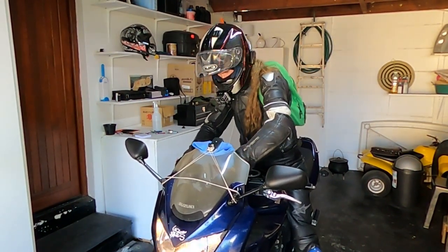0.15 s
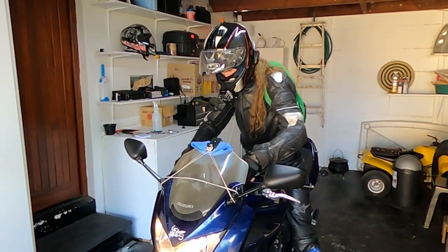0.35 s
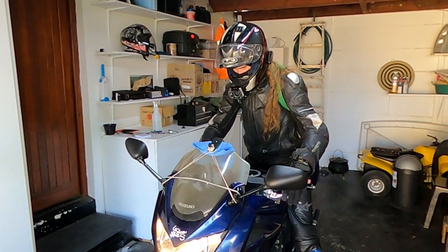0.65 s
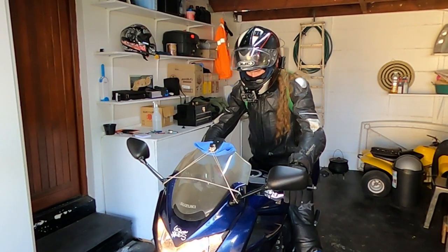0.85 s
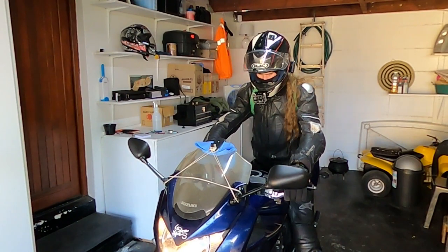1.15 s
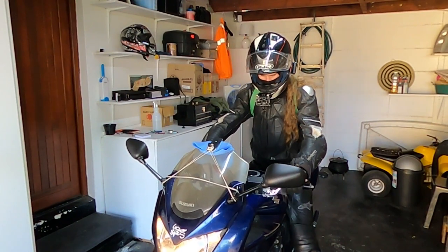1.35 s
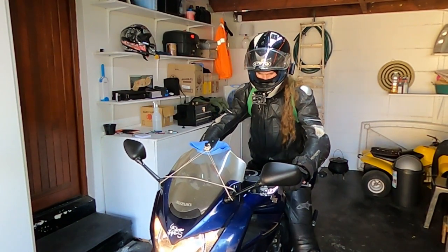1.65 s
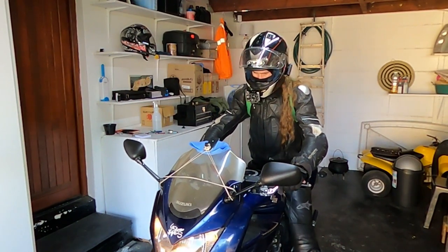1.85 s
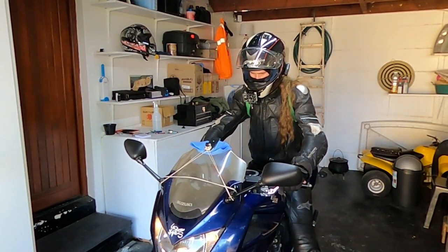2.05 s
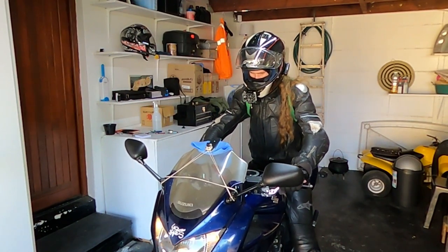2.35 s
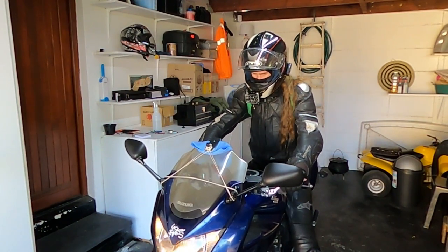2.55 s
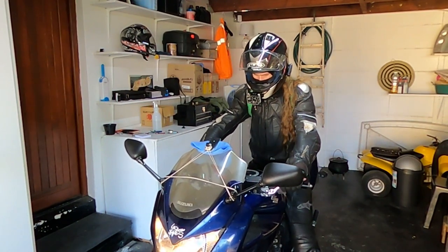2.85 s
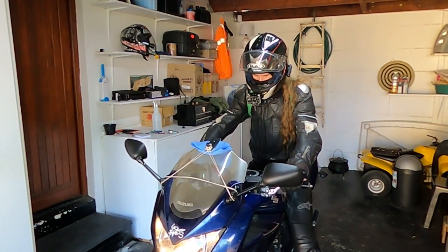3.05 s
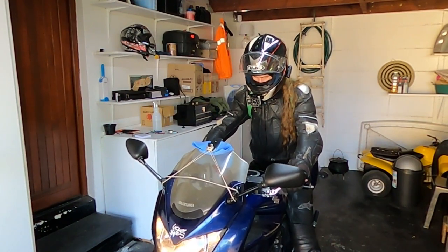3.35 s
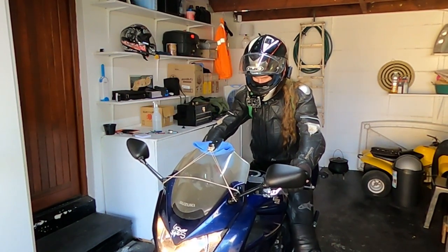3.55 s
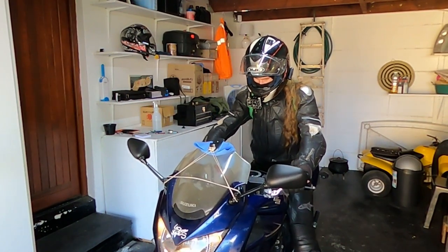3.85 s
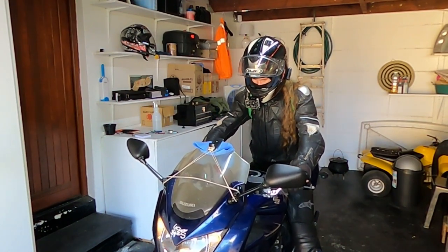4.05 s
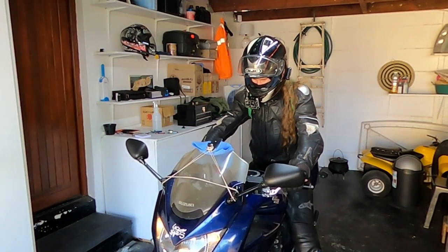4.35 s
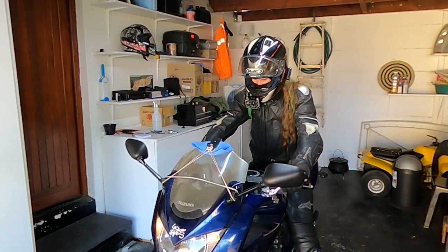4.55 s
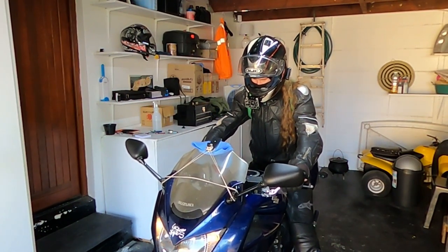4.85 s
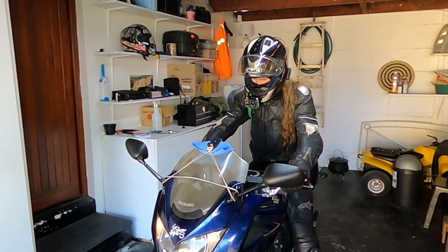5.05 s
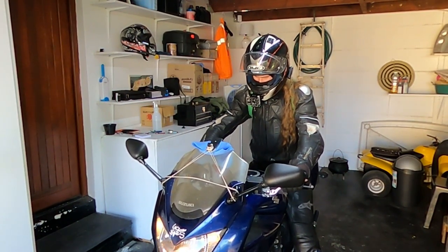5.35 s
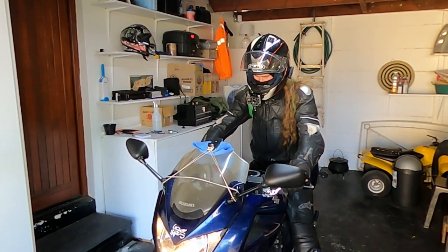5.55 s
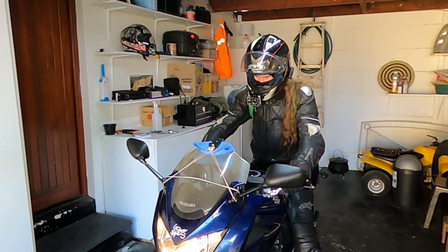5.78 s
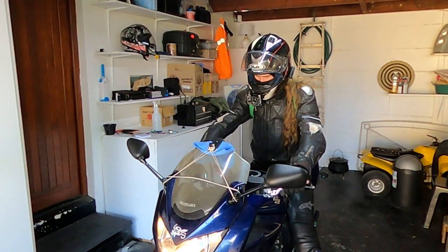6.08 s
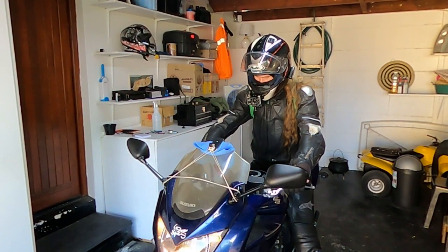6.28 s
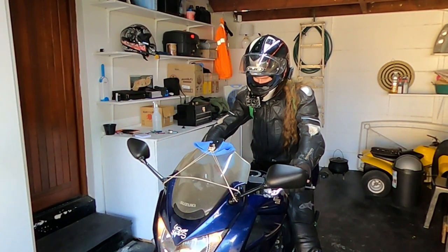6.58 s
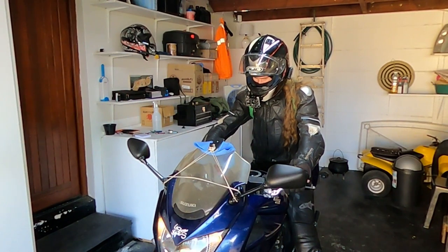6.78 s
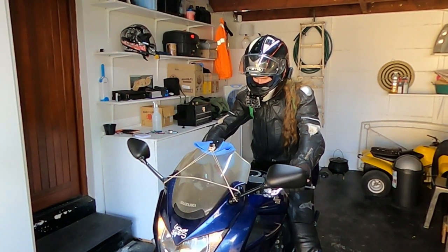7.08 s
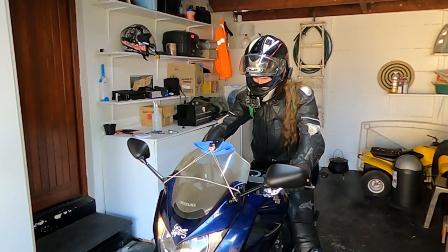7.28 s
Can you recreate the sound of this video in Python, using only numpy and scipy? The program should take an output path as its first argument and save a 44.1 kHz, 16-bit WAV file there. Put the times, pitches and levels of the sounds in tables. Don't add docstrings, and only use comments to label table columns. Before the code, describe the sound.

In a small, reverberant garage, a rider's leathers creak and a key clinks. A motorcycle starter then whines, pulsing under compression, and the engine catches in a rough, barking run before stalling with a clank. A longer crank yields only a brief cough and more clanks; a third short crank ends in a few weak firings. Close stereo microphone, faint traffic rumble outside.

```python
import sys
import numpy as np
from scipy import signal
from scipy.fft import rfft, irfft, next_fast_len
from scipy.io import wavfile
from scipy.ndimage import uniform_filter1d, map_coordinates

SR = 44100
rng = np.random.default_rng(int(sys.argv[2]) if len(sys.argv) > 2 else 0)


def bounce(signal):
    frames = np.transpose(np.atleast_2d(signal))
    limited = np.clip(frames, -1, 1)
    pcm = np.round(limited * 32767).astype(np.int16)
    wavfile.write(sys.argv[1], SR, pcm)


def volts_from_db(level):
    exponent = np.asarray(level, float) / 20
    return 10 ** exponent


N = 327222
T = np.arange(N) / SR

# (time [s], spin-up [s], hold [s], level [dB])
STARTER_STARTS = [
    (1.929, 0.066, 0.034, -31),
    (3.873, 0.11, 0.014, -34.5),
    (6.366, .126, 0.067, -33),
]
# (time [s], rise [s], top tooth rate [Hz], droop [s], tooth rate after droop [Hz])
SPIN_UPS = [
    (1.929, 0.098, 1050, 0.019, 1042),
    (3.872, 0.081, 862, .057, 791.1),
    (6.368, .085, 828, .107, 790.2),
]
# (time [s], length [s], clatter [dB], bark [dB], boom [dB])
ENGINE_CATCHES = [
    (2.366, 0.88, -23.5, -17.5, -36),
    (5.274, 0.35, -23.5, -29, -27),
    (6.946, 0.272, -21.5, -29, -28.5),
]
# (time [s], peak level [dB])
UNFIRED_PUFFS = [(2.126, -20), (2.225, -23), (2.328, -20), (4.076, -20.5), (4.173, -20.5), (4.279, -25),
                 (4.387, -25), (4.476, -24.5), (4.587, -22), (4.689, -23.5), (4.799, -24), (4.9, -23),
                 (5.01, -24.5), (5.103, -23), (5.218, -23.5), (6.473, -23), (6.594, -22.5), (6.686, -25.5),
                 (6.786, -23), (6.889, -25), (7.289, -26), (7.379, -32)]
# (frequency [Hz], width [Hz], level [dB])
CASING_MODES = [(450, 98, -8.5), (964, 60, 0), (1102, 53, 5.5), (1192, 49, 6.5), (1291.2, 130, 5.5),
                (1612, 220, 2), (2383, 120, 0), (2896, 500, -3), (4015, 120, -5), (4800, 270, -5),
                (5476, 80, -5.5), (6223, 170, -3.5), (7380, 160, -7.5), (8980, 180, -12.5),
                (10070, 140, -14), (11180, 130, -25)]
# (time [s], level [dB])
STREET_LEVEL = [(0, -61.5), (.4, -65.5), (1.9, -62.5), (3.3, -54), (3.95, -52), (5.8, -58), (7.42, -54.5)]

CRANK_DB, REST_HZ = -16.5, 310.3


def unit(x):
    return x / np.sqrt(np.mean(x ** 2) + 1e-20)


def along(points, hz):
    f, v = np.transpose(points)
    return np.interp(np.log(hz + 1), np.log(f + 1), v)


def gain(rows):
    s, db = np.transpose(rows)
    return volts_from_db(np.interp(T, s, db, -120, -120))


def wobble(rate_hz):
    knots = rng.standard_normal(int(N * rate_hz / SR) + 4)
    return map_coordinates(knots, [T * rate_hz])


def filtered(x, response):
    m = next_fast_len(N + SR // 2)
    return irfft(rfft(x, m) * response(np.fft.rfftfreq(m, 1 / SR)), m)[..., :N]


def resonances(peaks):
    def response(f):
        total = 0
        for k, (c, w, db) in enumerate(peaks):
            total = total + (-1) ** k * volts_from_db(db) * 1j * f * w / (c * c - f * f + 1j * f * w)
        return total
    return response


def mode(x, hz, width_hz, db):
    b, a = signal.iirpeak(hz, hz / (1.5 * width_hz), SR)
    return volts_from_db(db) * signal.lfilter(b, a, signal.lfilter(b, a, x))


def hiss(spectrum, grain_db=0):
    x = rng.standard_normal(N) * volts_from_db(grain_db * wobble(300))
    return unit(filtered(x, lambda hz: volts_from_db(along(spectrum, hz))))


def blows(rows):
    s, db = np.transpose(rows)[:2]
    return np.bincount(np.round(s * SR).astype(int), volts_from_db(db), N)[:N]


def held(s, length_s, db, attack_s, fade_db, release_db):
    t = np.maximum(T - s, 0)
    return (1 - np.exp(-t / attack_s)) * volts_from_db(db - fade_db * t - release_db * np.maximum(t - length_s, 0))


def starter():
    # (multiple of tooth rate, level [dB])
    teeth = [(1, 0.5), (2, -1), (3, -6), (4, 0), (5, -3), (6, -6), (7, -9.5), (8, -11.5), (9, -7.5),
             (10, -13)]
    # (frequency [Hz], width [Hz], level [dB])
    shell = [(820, 110, 0), (980, 120, 1), (1206, 230, 3), (1670, 250, 2.5), (2070, 92, 2.5),
             (2248, 360, -2.5), (2411, 130, 5.5), (2896, 230, 9), (3291, 78, -1), (3980, 200, -3.5),
             (5200, 270, -7.5), (6240, 570, -5.5), (7440, 300, -8), (8800, 400, -12.5), (10100, 300, -10.5)]
    # (frequency [Hz], density [dB per Hz])
    rasp_spectrum = [(3240, -33.5), (6180, -3.5), (7580, -7.5), (8440, -23), (10200, -14.5), (11300, -24.5),
                     (12500, -31.5), (13600, -23), (14900, -49.5)]
    # (frequency [Hz], density [dB per Hz])
    grind_spectrum = [(41, -44), (70, -10), (109, -34), (155, -12), (513, -14.5), (720, -16.5),
                      (1160, -6.5), (2880, -11), (3760, -12), (6120, -15), (9000, -28), (11700, -54),
                      (19800, -120)]
    shell_floor_db = -14

    load, bite, hz = gear_load()
    hz = uniform_filter1d(spun_up(hz), size=SR // 200) * (1 + .009 * wobble(90))
    turn = 2 * np.pi * np.cumsum(hz) / SR

    whine = np.zeros(N)
    for k, db in teeth:
        flutter = volts_from_db(db + 4 * np.tanh(wobble(85)))
        whine += flutter * meshing(hz, k) * np.sin(k * turn + k * k)
    whine = filtered(load * bite * whine, lambda f: abs(resonances(shell)(f)) ** 1.5 + volts_from_db(shell_floor_db))

    knocks = (1 + 0.57 * np.cos(turn)) * rng.standard_normal(N) * volts_from_db(2.7 * wobble(150))
    speed = np.minimum(hz / 1100, 1.12)
    rung = np.zeros(N)
    for peak in CASING_MODES:
        caught = volts_from_db(4 * np.tanh(wobble(28))) * speed ** (peak[0] / 5000)
        rung += caught * mode(load * knocks, *peak)
    load_rms = np.sqrt(np.mean(load ** 2))
    tones = load_rms * (volts_from_db(-4.5) * unit(whine) + volts_from_db(-7.0) * unit(rung))

    inrush = sum(held(row[0], 0.057, 10.5, 0.035, 5.5, 110) for row in STARTER_STARTS)
    flicker = volts_from_db(1.5 * wobble(45)) * (1 + .8 * np.cos(turn))
    rasp = volts_from_db(-16) * load * np.sqrt(load / volts_from_db(CRANK_DB)) * (0.5 + inrush)
    rasp = rasp * speed ** 3 * flicker * hiss(rasp_spectrum, grain_db=1.0)
    grind = volts_from_db(-9.5) * load * volts_from_db(1.2 * wobble(35)) * hiss(grind_spectrum, grain_db=3)
    return tones + rasp + grind


def gear_load():
    load, bite, hz = np.zeros(N), np.zeros(N), np.full(N, 900.)
    for s, length, db, sag_db, start_hz, slow_hz, slowing in strokes():
        inside = (T >= s) & (T < s + length)
        u = (T[inside] - s) / length
        bend = 1.5 if sag_db > 0 else .4
        load[inside] = volts_from_db(db - sag_db * np.minimum(u / 0.64, 1) ** bend)
        slack_db = (5 + 1.5 * sag_db) * (sag_db > 1)
        bite[inside] = 1e-6 + volts_from_db(-slack_db * np.clip((u - .45) / .3, 0, 1))
        fall = np.cos(np.pi / 2 * np.minimum(u * length / slowing, 1)) ** 2
        hz[inside] = slow_hz + (start_hz - slow_hz) * fall
    load = abs(uniform_filter1d(load, size=SR // 75))
    for row in STARTER_STARTS:
        load[(T > row[0] - .02) & (T < row[0])] = 0
    return load, abs(uniform_filter1d(bite, size=SR // 200)), hz


def strokes():
    # (time [s], length [s], effort [dB], sag [dB], slowing time [s])
    compressions = [(2.032, .17, -0.5, 2.5, 0.1216), (2.207, 0.094, 0.5, 2.5, 0.043),
                    (2.311, .093, 0.5, 5, 0.062), (4.003, 0.15, 0, 4, 0.13), (4.161, 0.095, 0, 5, .045),
                    (4.257, 0.094, 0, 5, 0.062), (4.358, 0.1, 1.5, 9, .057), (4.465, 0.093, -0.5, 4, 0.056),
                    (4.571, .1, 0, 6, 0.057), (4.673, .105, 0, 5.5, .058), (4.778, .111, 1, 6, .062),
                    (4.89, .105, 0.5, 6.5, .055), (4.994, .102, -0.5, 4.5, .058),
                    (5.095, .106, -1, 6, .058), (5.198, .098, -1.5, 2, .057), (6.552, .11, 0.5, 3.5, .057),
                    (6.68, 0.1, 1, 6, 0.047), (6.775, 0.0863, 0.5, 5, .051), (6.871, 0.098, 1, 8.5, 0.067),
                    (7.28, 0.0942, 0.5, 9.5, 0.069), (7.368, .11, -1.5, 2.5, 0.086)]
    # (time [s], length [s], level [dB], sag [dB])
    overruns = [
        (5.555, .06, -22, 13),
        (7.087, .072, -18.5, 12),
        (7.159, .045, -27, 2),
        (7.207, .066, -17, 11),
    ]
    usual_s, free_hz, loaded_hz = .103, 1223, 870.5
    race_hz, race_loaded_hz = 1409, 1280
    swell_db, held_db, hold_sag_db = 15, 12.5, -1.5

    rows = []
    for s, length, db, sag_db, slowing in compressions:
        pace = usual_s / length
        rows.append((s, length, CRANK_DB + db, sag_db, free_hz * min(pace, 1) ** .2,
                     loaded_hz * pace ** .45, slowing))
    for row in overruns:
        rows.append((*row, race_hz, race_loaded_hz, .58 * row[1]))
    for s, spin, hold, db in STARTER_STARTS:
        rows.append((s, spin, db, -swell_db, REST_HZ, REST_HZ, 1))
        rows.append((s + spin, hold, db + held_db, hold_sag_db, REST_HZ, REST_HZ, 1))
    return rows


def spun_up(hz):
    for s, rise, top_hz, droop, end_hz in SPIN_UPS:
        arch = REST_HZ + (top_hz - REST_HZ) * np.sin(np.pi / 2 * np.clip((T - s) / rise, 0, 1))
        arch = arch + (end_hz - top_hz) * np.clip((T - s - rise) / droop, 0, 1)
        hz = np.where((T >= s) & (T < s + rise + droop + .004), arch, hz)
    return hz


def meshing(hz, multiple):
    droop_db, mesh_hz, mesh_share = -10, 720, 0.89
    lost_db, full_hz = np.zeros(N), np.full(N, float(mesh_hz))
    for s, rise, top_hz, droop, _ in SPIN_UPS:
        lost_db += droop_db * np.clip((T - s - rise) / droop, 0, 1) * (T < s + rise + droop)
        full_hz[(T >= s) & (T < s + rise)] = mesh_share * top_hz
    return volts_from_db(lost_db) * np.minimum(hz / full_hz, 1) ** (3 + 14 / multiple)


def exhaust():
    # (frequency [Hz], level [dB], t60 [s], polarity)
    pipe_modes = [(35, -33, 0.518, 0.74), (55.45, -14, 0.69, 0.5), (78.3, -12.5, 0.24, 1.34),
                  (105.3, -8, 0.5, -0.33), (113.7, -21, 0.13, 2.2), (159.3, -16, 0.47, -0.58),
                  (181.5, -39.5, 0.71, 0.23), (210, -27.5, 0.16, 1.35)]
    # (frequency [Hz], width [Hz], level [dB])
    chambers = [(118.1, 41, 2.5), (220.5, 38, 2), (251.7, 34, 0), (361, 18, -1.5), (493, 15, -18)]
    puff_dull_hz = 110
    bark_fade_db = 28.5
    street_boom_db, puff_boom_db = -10.5, -15.5

    t = T[:SR // 2]
    ring = sum(sign * volts_from_db(db - 60 * t / t60) * np.sin(2 * np.pi * hz * t) for hz, db, t60, sign in pipe_modes)
    ring = ring * (1 - np.exp(-t / 0.0038))
    puffs = volts_from_db(6.0) * filtered(blows(UNFIRED_PUFFS), lambda f: 1 / (1 + 1j * f / puff_dull_hz))
    thumps = signal.fftconvolve(bangs() + puffs, ring)[:N]

    beat = signal.fftconvolve(bangs(), volts_from_db(-60 * t / 0.28) * (1 - np.exp(-t / 0.017)))[:N]
    bark = sum(held(s, n, db, 0.014, bark_fade_db, 230) for s, n, _, db, _ in ENGINE_CATCHES)
    bark = bark * (0.67 + 0.86 * beat)
    gas = unit(filtered(rng.standard_normal(N) * volts_from_db(0.62 * wobble(50)), resonances(chambers)))

    swell = sum(held(s, n, db, 0.11, 2.2, 110) for s, n, _, _, db in ENGINE_CATCHES)
    swell = swell + sum(held(s, 0.04, db + puff_boom_db, 0.018, 5, 120) for s, db in UNFIRED_PUFFS)
    swell = swell + volts_from_db(street_boom_db) * gain(STREET_LEVEL)
    boom = np.sqrt(2) * np.sin(2 * np.pi * np.cumsum(31.5 + 0.5 * wobble(14)) / SR)
    return thumps + volts_from_db(0.5) * bark * gas + swell * volts_from_db(1.8 * wobble(7.3)) * boom


def bangs():
    # (time [s], strength [dB])
    firings = [
        [(2.389, 1), (2.41, 5), (2.428, 0), (2.458, 2), (2.476, -7), (2.508, -2), (2.526, -7.5), (2.55, -0.5),
         (2.579, -5), (2.599, -4), (2.646, 0.5), (2.682, -21), (2.735, -0.5), (2.754, -17), (2.784, -1.5),
         (2.84, -2), (2.869, 0), (2.9, 1), (2.946, -2.5), (2.967, -6.5), (3.041, -2.5), (3.083, -7.5)],
        [(5.288, 2.5), (5.307, -7), (5.359, -5), (5.444, 0)],
        [(6.965, 2), (7.013, -5), (7.04, -10), (7.146, -1.5)],
    ]
    slot_s, slot_growth, skipped = .016, .022, 1.6
    miss_db, stall_s, stall_db = -19.5, .041, -11.5

    rows = []
    for run in firings:
        s = np.transpose(run)[0]
        missed = np.diff(s) > skipped * (slot_s + slot_growth * (s[:-1] - s[0]))
        midway = (s[1:] + s[:-1]) / 2
        rows += run
        rows += [(t, miss_db) for t in midway[missed]]
        rows += [(s[-1] + stall_s, stall_db)]
    return blows(rows)


def valves():
    # (frequency [Hz], density [dB per Hz])
    clatter_spectrum = [(180, -23.5), (300, -4), (365, -32.5), (420, 3.5), (560, -7.5), (1200, -4.5),
                        (3770, -14.5), (7610, -26.5), (12400, -70), (14900, -68)]
    # (time [s], level [dB], t60 [s])
    kickbacks = [(3.03, -29, 0.34), (5.27, -5.5, 0.053), (5.556, -18.5, 0.22), (5.705, -24, 0.19),
                 (3.195, -30, 0.29), (6.949, -27, 0.16), (7.201, -24, 0.87)]
    fade_db = 16

    level = sum(held(s, n, db, 0.0027, fade_db, 420) for s, n, db, _, _ in ENGINE_CATCHES)
    level = level + sum(held(s, 0, db, 0.015, 60 / t60, 0) for s, db, t60 in kickbacks)
    beat = signal.fftconvolve(bangs(), volts_from_db(-60 * T[:SR // 5] / 0.13))[:N]
    rung = unit(filtered(rng.standard_normal(N), resonances(CASING_MODES)))
    rattle = hiss(clatter_spectrum, grain_db=1.5) + volts_from_db(-18.5) * rung
    return volts_from_db(-2.0) * level * (0.66 + 1.1 * beat) * rattle


def intake():
    # (frequency [Hz], width [Hz], level [dB])
    air_box = [(260.4, 99, -9.5), (434.7, 40, 1.5), (630, 370, -8)]
    # (time [s], peak level [dB])
    kicks = [
        (1.941, -21.5),
        (3.884, -19),
        (6.381, -26.5),
    ]
    first_gulp_db = -14

    t = T[:SR // 4]
    first = np.diff(np.transpose(UNFIRED_PUFFS)[0], prepend=0) > .5
    rows = [(s, db + first_gulp_db * one) for (s, db), one in zip(UNFIRED_PUFFS, first)]
    gulps = signal.fftconvolve(blows(rows), volts_from_db(-60 * t / 0.31) * (1 - np.exp(-t / 0.019)))[:N]
    thuds = signal.fftconvolve(blows(kicks), volts_from_db(-60 * t / 0.15) * (1 - np.exp(-t / 0.024)))[:N]
    air = unit(filtered(rng.standard_normal(N), resonances(air_box)))
    return (volts_from_db(3) * gulps + volts_from_db(2) * thuds) * air


def struck(rows, peaks, broad_db, rise_s):
    def metal(f, tilt_db):
        body = resonances(peaks)(f) + volts_from_db(broad_db) / (1 + 1j * f / 6000) ** 2
        return body * volts_from_db(tilt_db * np.log2((f + 200) / 3000)) * (1j * f / (400 + 1j * f)) ** 2

    out = np.zeros(N)
    for s, db, tilt_db, t60 in rows:
        t = np.maximum(T - s, 0)
        rattle = rng.standard_normal(N) * volts_from_db(db - 60 * t / t60) * (1 - np.exp(-t / rise_s))
        out += filtered(rattle, lambda f: metal(f, tilt_db))
    return out


def clanks():
    # (frequency [Hz], width [Hz], level [dB])
    steel = [(488, 170, -11), (1250, 290, 5.5), (1640, 100, 8.5), (3030, 1100, 5.5), (4364, 510, 7),
             (7200, 550, 1)]
    # (time [s], peak level [dB], tilt [dB per octave], t60 [s])
    gear_clanks = [
        (0.6796, -39, -4.5, 0.082),
        (3.1966, -18.5, -3.5, 0.052),
        (5.5638, -24.5, -6, 0.14),
        (5.7084, -17.5, -3.5, 0.055),
        (7.276, -22, 1, 0.054),
    ]
    # (time [s], peak level [dB], tilt [dB per octave], t60 [s])
    grips = [
        (1.937, -21, -4.5, 0.1),
        (3.881, -27, -4.5, 0.092),
        (6.379, -25, -4, 0.13),
    ]
    # (time [s], peak level [dB], tilt [dB per octave], t60 [s])
    nudges = [(0.057, -34.5, -3.5, 0.197), (3.471, -47.5, -6.5, 0.15), (3.812, -46.5, -14.5, 0.2),
              (5.854, -38, -4, 0.15), (6.049, -49, -13.5, 0.1106)]
    hard = volts_from_db(7.0) * struck(gear_clanks + grips, steel, broad_db=0.5, rise_s=0.0038)
    return hard + volts_from_db(-9.5) * struck(nudges, steel, broad_db=-12.5, rise_s=0.0015)


def rider():
    # (time [s], length [s], creak [dB], rustle [dB])
    moves = [(-.1, 0.11, -64, -54.5), (0.092, 0.073, -61, -56), (0.245, 0.27, -62.5, -73.5),
             (0.414, 0.3, -59, -57), (0.637, 0.26, -48.5, -49.5), (0.887, 0.2145, -40.5, -50.5),
             (1.129, 0.21, -44, -47), (1.335, 0.16, -40.5, -54), (1.65, 0.43, -58, -64.5),
             (3.8, .07, -79, -50)]
    # (frequency [Hz], density [dB per Hz])
    seat = [(59, -58), (100, -24), (141, -5), (270, 1), (456, -6.5), (652, -10), (900, -18), (1170, -66.5),
            (1980, -120)]
    # (frequency [Hz], density [dB per Hz])
    leather = [(290, -51.5), (500, -18.5), (898, -7), (1360, -1), (3390, -14), (4860, -20.5), (6770, -19.5),
               (12000, -45), (15600, -70.5), (22000, -120)]
    # (time [s], peak level [dB], tilt [dB per octave], t60 [s])
    clinks = [
        (0.0928, -24.5, -0.5, 0.17),
        (0.4539, -48, -4, 0.14),
        (0.5094, -47.5, -3.5, 0.17),
    ]
    # (frequency [Hz], width [Hz], level [dB])
    key_modes = [(2600, 990, -11), (4750, 230, 0), (5230, 230, 0.5), (6250, 560, -6), (7000, 143, 2),
                 (7900, 304, -1.5), (8660, 300, -7.5), (10940, 730, -8.5)]
    # (time [s], peak level [dB], tilt [dB per octave], t60 [s])
    ticks = [(1.4595, -38.5, 5, 0.067), (1.7644, -49.5, -0.5, 0.07), (1.813, -53, 3, .05),
             (1.675, -57, 0.5, .05)]
    # (frequency [Hz], width [Hz], level [dB])
    buckle_modes = [(5800, 500, -16.5), (6950, 240, 0), (7680, 300, -8), (8700, 340, -9)]

    creak = sum(held(s, n, db, 0.052, 6.7, 160) for s, n, db, _ in moves)
    creak = volts_from_db(0.5) * creak * volts_from_db(2.0 * wobble(25)) * hiss(seat)
    rustle = sum(held(s, n, db, 0.034, 10, 77) for s, n, _, db in moves)
    rustle = volts_from_db(0.5) * rustle * hiss(leather, grain_db=2.5)
    key = volts_from_db(3.5) * struck(clinks, key_modes, broad_db=-26, rise_s=0.0013)
    buckle = volts_from_db(6.5) * struck(ticks, buckle_modes, broad_db=-11.5, rise_s=.0008)
    return creak + rustle + key + buckle


def garage(x):
    # (frequency [Hz], t60 [s])
    decay = [(200, 0.583), (2000, 0.41), (10000, 0.41)]
    hz, t, z = signal.stft(rng.standard_normal((2, SR)), SR, nperseg=256)
    tail = signal.istft(z * volts_from_db(-60 * t / along(decay, hz)[:, None]), SR, nperseg=256)[1]
    x = filtered(x, lambda f: f / (f + 150))
    delayed = np.pad(x, (250, 0))[None]
    return signal.fftconvolve(delayed, tail / np.linalg.norm(tail[0]), axes=1)[:, :N]


def traffic():
    # (frequency [Hz], density [dB per Hz])
    rumble = [(31, -32), (52, 6.5), (104, -7.5), (124, -18.5), (156, -17.5), (177, -29), (300, -30.5),
              (390, -56.5), (660, -120)]
    return gain(STREET_LEVEL) * volts_from_db(2.5 * wobble(5.5)) * hiss(rumble)


def room_air():
    # (frequency [Hz], density [dB per Hz])
    air_spectrum = [(88, -32), (150, 0.5), (178, -7), (366, -19), (545, -28), (647, -29.5), (1210, -24.5),
                    (3070, -37.5), (7070, -41), (14000, -63)]
    return volts_from_db(-60) * hiss(air_spectrum)


def scene():
    # (frequency [Hz], side over mid [dB])
    width = [(60, -26.5), (150, -11), (300, -21.5), (620, -23), (850, -26), (1100, -12), (2300, -5.5),
             (4300, -5), (6500, -5.5), (8500, -4), (14000, 0)]
    # (frequency [Hz], left over right [dB])
    lean = [(60, .3), (500, .1), (1000, -.4), (2000, -1.2), (4000, -.7), (8000, .4), (14000, .1)]
    near = volts_from_db(-2.5) * (starter() + intake() + valves() + clanks() + rider())
    wet, other = garage(near)
    pipe = exhaust()
    mid = near + volts_from_db(-2.0) * wet + pipe + room_air() + traffic()
    side = filtered(volts_from_db(-2.0) * other + room_air(), lambda hz: volts_from_db(along(width, hz)))
    side = side + volts_from_db(-34.0) * np.roll(pipe, SR // 300)
    stereo = np.array([mid + side, mid - side])
    return filtered(stereo, lambda hz: volts_from_db(np.outer([.5, -.5], along(lean, hz))))


def patchy(x):
    patchy_hz, patchy_db = 7800, 3.5
    hz, t, z = signal.stft(x, SR, nperseg=2048)
    bands = rng.standard_normal((len(hz) // 24 + 1, len(t)))[np.arange(len(hz)) // 24]
    bands = np.where(bands < 0, 1.5 * bands, .6 * bands)
    return signal.istft(z * volts_from_db(patchy_db * bands * (hz > patchy_hz)[:, None]), SR, nperseg=2048)[1][:, :N]


def roll_off(x):
    return signal.sosfilt(signal.butter(12, 15020, fs=SR, output="sos"), x)


def record(dry):
    # (frequency [Hz], response [dB])
    mic = [(100, 0), (12500, 0), (14300, -4), (14900, -20), (15100, -70)]
    low_cut_hz, limit = 10, .75
    x = filtered(patchy(dry), lambda hz: volts_from_db(along(mic, hz)) * 1j * hz / (low_cut_hz + 1j * hz))
    x = x / (1 + abs(x / limit) ** 4) ** .25
    return roll_off(x)


dry = scene()
out = record(dry)
bounce(out)
```